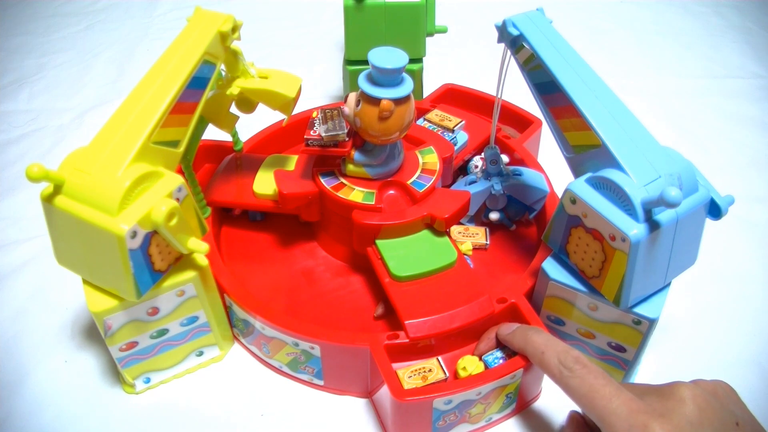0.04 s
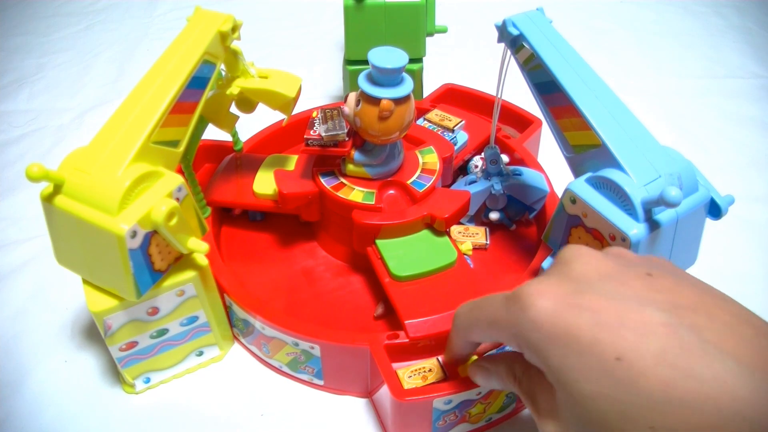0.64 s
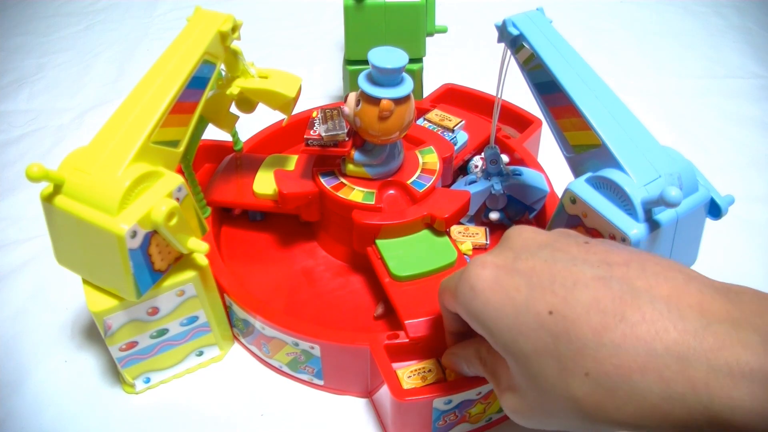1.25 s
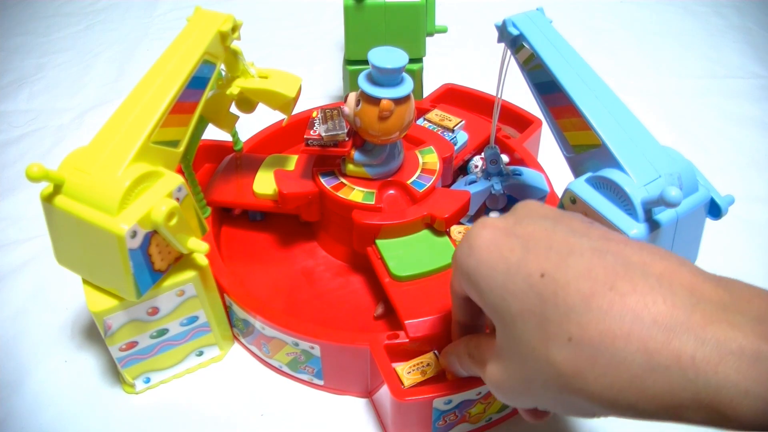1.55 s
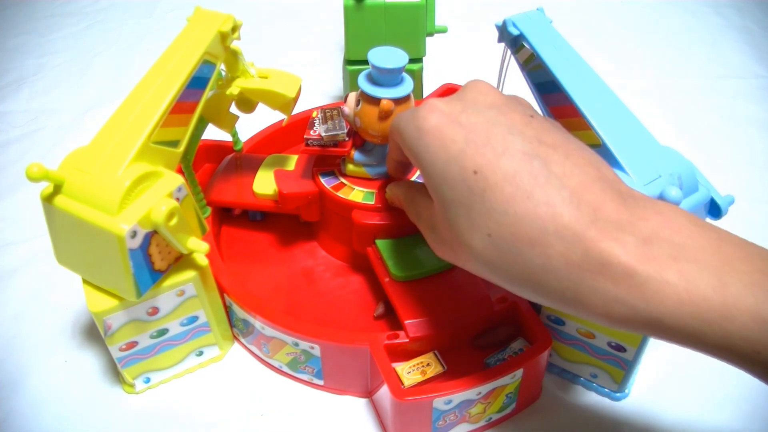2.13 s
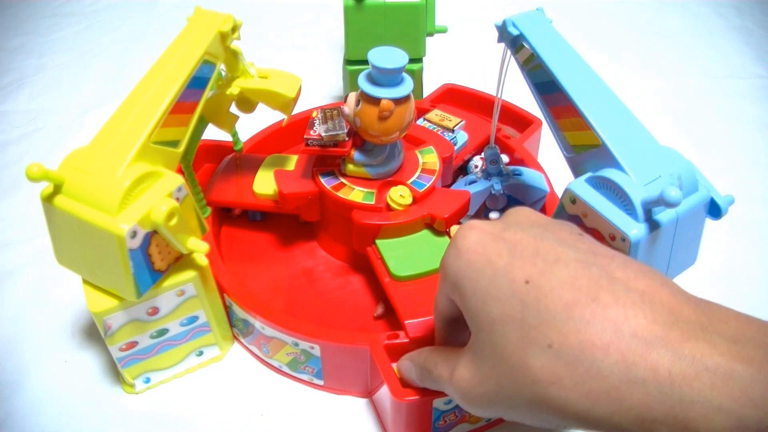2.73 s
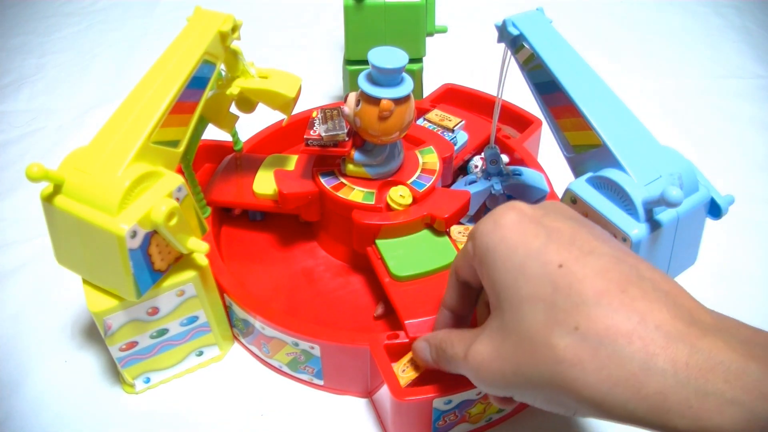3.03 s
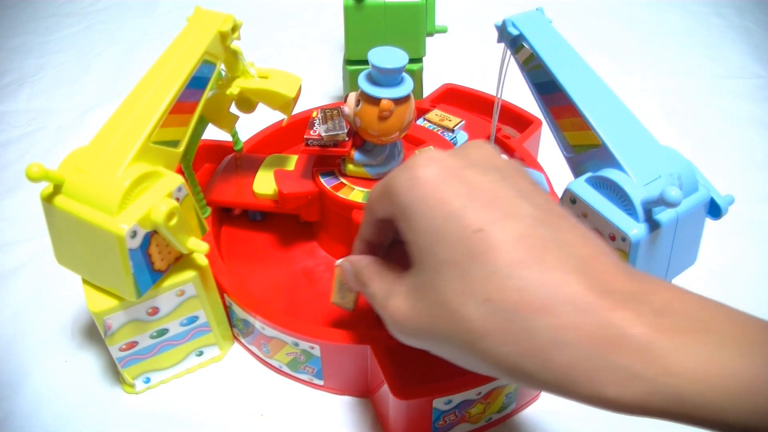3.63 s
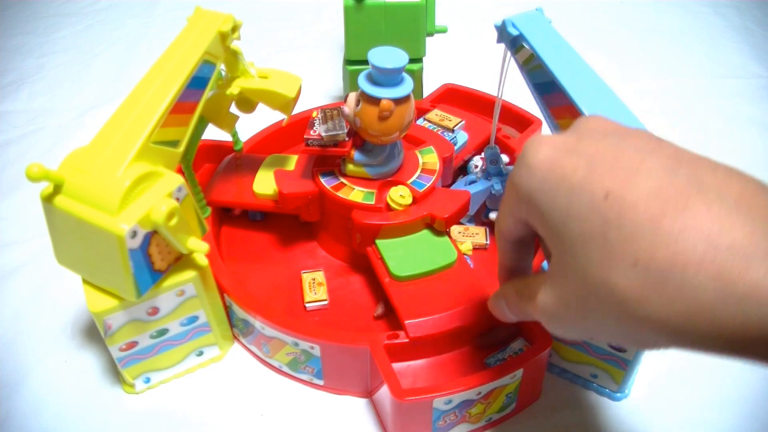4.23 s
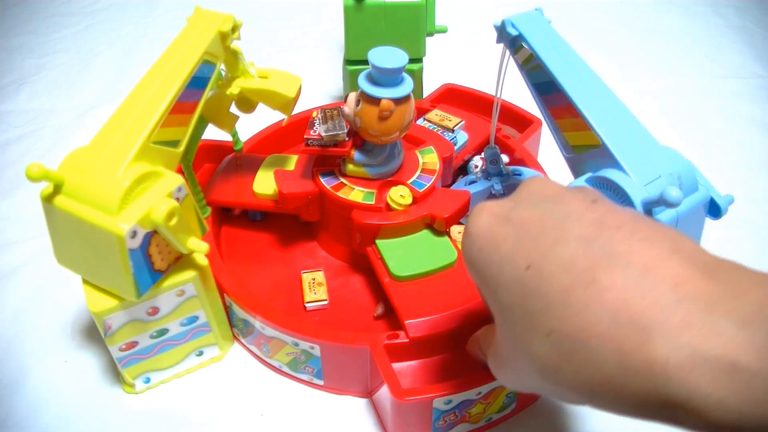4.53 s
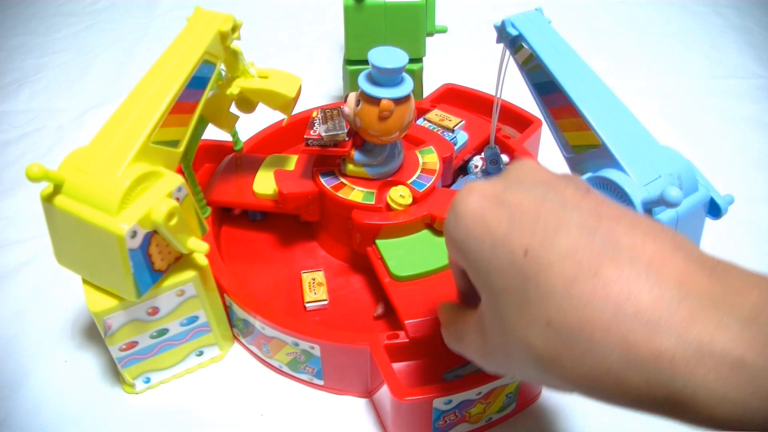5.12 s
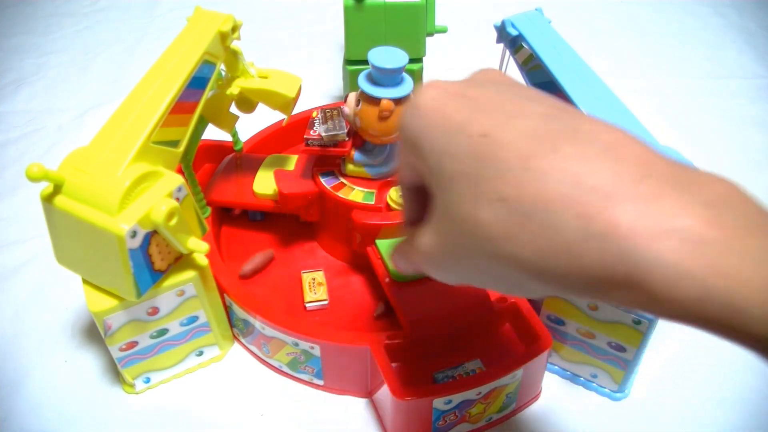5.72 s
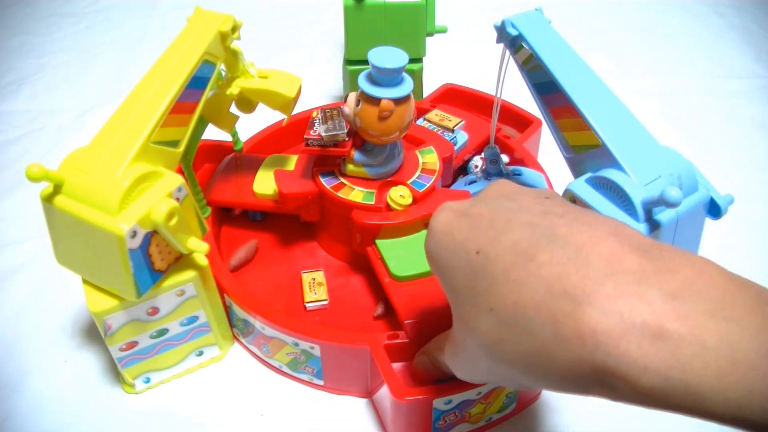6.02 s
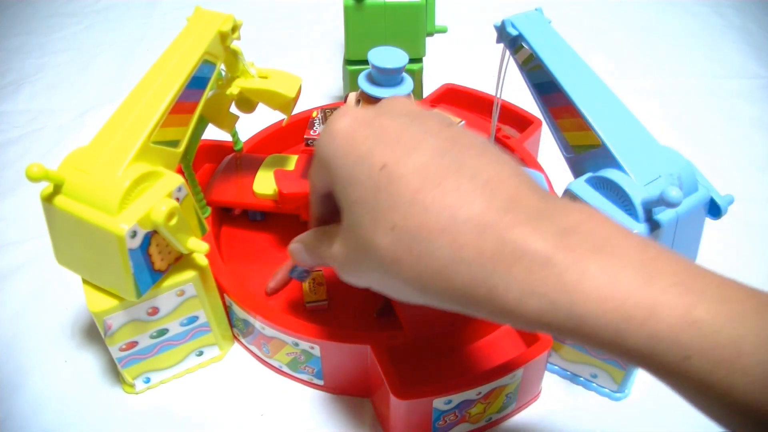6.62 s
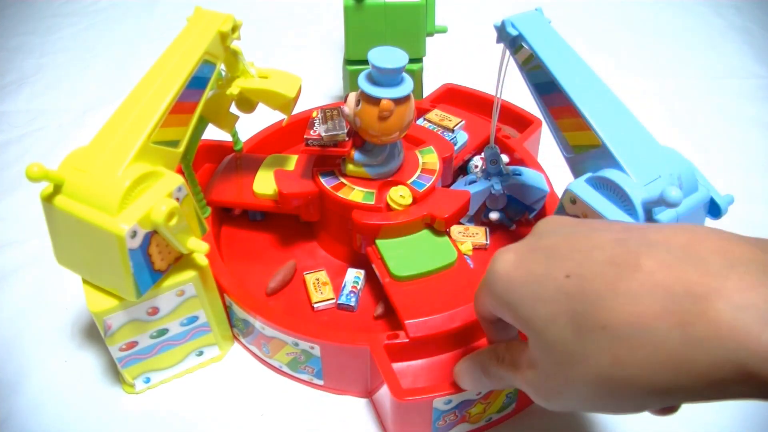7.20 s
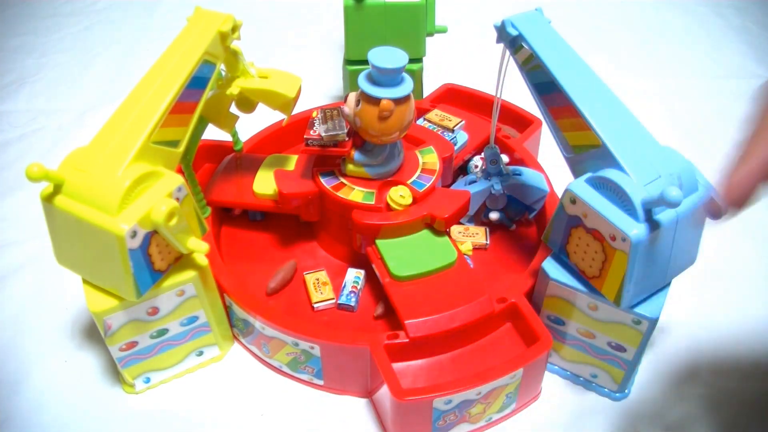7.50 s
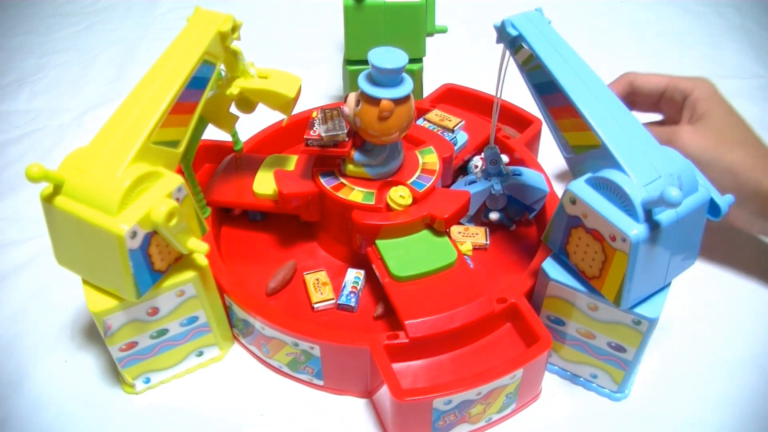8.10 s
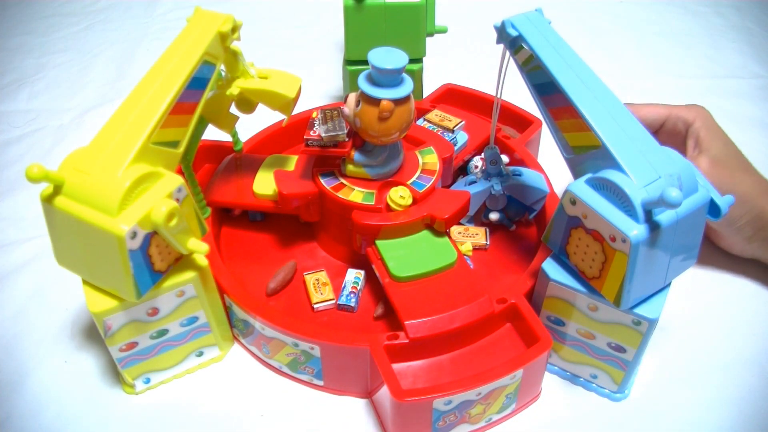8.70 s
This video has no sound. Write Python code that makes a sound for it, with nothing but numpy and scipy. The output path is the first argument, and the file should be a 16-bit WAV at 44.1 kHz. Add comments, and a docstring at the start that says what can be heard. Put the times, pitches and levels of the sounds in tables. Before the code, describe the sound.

After a faint swish of clothing, fingers pick small plastic prizes from the tray of a toy crane game and set or drop them on its hollow turntable. Sharp, irregular clacks, little bounces and wobbles make the thin shell ring briefly, with light ticks and fingertip scrapes between them. Soft bumps follow as the hand grasps the toy. It is close to a stereo microphone in a small room with a low hum.

```python
"""A faint swish of clothing and a fingertip scrape, then clacks: a hand picks small plastic prizes from
the tray of a toy crane game and sets or drops them on its hollow turntable. Each clack, bounce, tick,
press or wobble sets the thin shell ringing; fingers rub in the tray, and at the end they grasp the toy.
It stands on a table in a small room, close in front of a stereo microphone, with a low hum underneath."""
import sys
import numpy as np
from scipy import signal
from scipy.fft import rfft, irfft
from scipy.io import wavfile
from scipy.ndimage import uniform_filter1d

SR = 44100
rng = np.random.default_rng(int(sys.argv[2]) if len(sys.argv) > 2 else 0)


def transcribe(u):
    """Save the signal u as a 16-bit wav file named by the first command-line argument.

    u: samples, shape (n,) or (channels, n), limited to [-1, 1]; the rate is SR.
    q: integer samples, one column per channel.
    """
    v = np.clip(np.atleast_2d(u).T, -1, 1)
    q = np.round(v * 32767).astype(np.int16)
    wavfile.write(sys.argv[1], SR, q)


N = 385875


def prize_knocks():
    """Prizes strike the shell, hollow on a panel and bright on an edge, or bounce free and ring."""
    # strikes: start_s, level_db, hollow_db, bright_db_per_octave, ring_hz
    strikes = [(0.6696, 19, -9, -1, 1625), (0.796, 15.5, -5, 0, 3260), (0.8057, 14.5, -0.5, 1, 1680),
               (0.8731, 4, -0.5, -5, 1660), (1.1049, -3.5, 6.5, -0.5, 1740), (1.1795, 12.5, -3, 3.5, 3260),
               (1.5, -7.5, 6.5, -0.5, 1660), (1.5454, -13, 4, -12, 1630), (2.2015, 17, -9.5, -2, 4470),
               (2.228, -4.5, 7, -2.5, 1680), (2.5251, 1, 8.5, 0.5, 1630), (2.5837, -9, -2, -1, 1920),
               (3.236, 4, 8.5, 1.5, 3480), (3.5014, -12, 1, 0.5, 1580), (3.8006, 6, -2, -3.5, 1240),
               (3.839, -10, 4, -4, 1270), (3.9132, 9, -3, 4, 5250), (4.2298, -12.5, 10, 4.5, 1380),
               (4.2428, -7, 6.5, 4, 1410), (4.2965, -10.5, 4, -27, 1640), (4.5639, 11, 3, 1, 1035),
               (4.594, 2.5, -3, 0.5, 1350), (5.563, 19.5, 0.5, 2.5, 1300), (5.5926, 18, -6, 4, 1910),
               (6.4462, -1, -0.5, 0.5, 1950), (8.0674, -7.5, 4, 0.5, 1970)]
    # their tone: frequency_hz, gain_db
    strike_colour = [(220, -10), (900, -5), (1900, -1.5), (4500, -8), (11000, -17.5)]
    # free bounces: start_s, level_db, bright_db_per_octave
    bounces = [(0.7776, 1.5, -3), (3.9585, 2, -2.5), (3.9766, -1, -3), (5.2258, -15, 3.5),
               (5.8808, -1.5, -4.5), (5.9148, -8, -4.5), (6.7614, 3.5, 0.5), (6.791, -2, -2),
               (6.806, -5, 1), (6.865, -0.5, -2.5), (6.9102, -4, -1), (6.938, -7, 4), (6.958, -19, 5.5)]
    # their tone: frequency_hz, gain_db
    bounce_colour = [(220, -36), (900, -11), (1900, -4.5), (4500, -6.5), (11000, -13.5)]
    strike_ring_db, bounce_ring_hz, bounce_ring_db = 10.5, 3200, 13
    return ([(s, db, hollow, bright, strike_colour, hz, strike_ring_db)
             for s, db, hollow, bright, hz in strikes]
            + [(s, db, 0, bright, bounce_colour, bounce_ring_hz, bounce_ring_db)
               for s, db, bright in bounces])


def finger_knocks():
    """A nail or hard edge catches a prize with a tick; fingers land on the toy with a thud."""
    # ticks: start_s, level_db, bright_db_per_octave, ring_hz
    ticks = [(3.0817, -18, 6.5, 11800), (3.105, -14.5, -1.5, 11250), (3.219, -11.5, 0.5, 7140),
             (4.7694, -13, 1.5, 3900), (4.864, -5, -4, 8600), (5.1563, -2.5, 3, 7540),
             (5.9981, -8.5, -1, 7650), (6.1383, -16, -0.5, 3800), (6.69, 8, 0.5, 8170),
             (6.8366, -11, 0.5, 7600), (6.896, -4.5, 0.5, 8100), (7.073, -7, -1, 7300),
             (7.105, -10, 1, 7500)]
    # their tone: frequency_hz, gain_db
    tick_colour = [(220, -15), (900, -7), (1900, 1.5), (4500, -2.5), (11000, -6)]
    # finger presses: start_s, level_db, bright_db_per_octave, ring_hz
    presses = [(.264, -26, -1, 710), (0.6359, -17.5, -7, 1690), (.929, -16, -6, 1650),
               (2.6179, -5, -1.5, 780), (2.6321, -13.5, -0.5, 1610), (3.3297, -10, -14, 2150),
               (4.323, -20.5, -23, 575), (4.848, -8.5, -3, 5250), (4.928, -22.5, 1.5, 665),
               (6.012, -11, 4, 3620), (7.136, -10, 3, 3560), (8.09, -18.5, -1, 825), (8.126, -14, -23, 700),
               (8.147, -16.5, -24, 650)]
    # their tone: frequency_hz, gain_db
    press_colour = [(220, 21.5), (900, 5.5), (1900, -1.5), (4500, 3.5), (11000, -7)]
    tick_ring_db, press_ring_db = 11.5, 11
    return ([(s, db, 0, bright, tick_colour, hz, tick_ring_db) for s, db, bright, hz in ticks]
            + [(s, db, 0, bright, press_colour, hz, press_ring_db) for s, db, bright, hz in presses])


def wobble_knocks(ring_hz=1245, ring_db=17):
    """A loose prize rocks on the hollow turntable; the gentler the knock, the duller it is."""
    # rocking contacts: start_s, level_db
    wobbles = [(2.0266, -8), (5.7142, -0.5), (5.794, -8.5), (5.8844, -4), (6.295, -5.5), (6.3685, -14.5),
               (6.418, -13), (6.4343, -9), (6.6389, -9), (6.6484, -7), (7.361, -11.5)]
    # their tone: frequency_hz, gain_db
    colour = [(220, 1), (900, -2.5), (1900, -2), (4500, -3.5), (11000, -22)]
    brightening = 0.65   # dB per octave for each dB of level
    return [(s, db, 0, brightening * db, colour, ring_hz, ring_db) for s, db in wobbles]


def touch_knocks(strokes, count=20, over_rub_db=33.5, spread_db=1, ring_hz=3360, ring_db=6):
    """Rummaging fingers touch at random, most often and most firmly where they rub hardest."""
    # tone of a light touch: frequency_hz, gain_db
    colour = [(220, 11), (900, 7), (1900, 9), (4500, -19.5), (11000, 11.5)]
    rubbed_so_far = np.cumsum(strokes) / np.sum(strokes)
    at = np.searchsorted(rubbed_so_far, rng.random(count)).clip(0, N - 1)
    levels_db = 20 * np.log10(strokes[at] + 1e-9) + over_rub_db + spread_db * rng.standard_normal(count)
    return [(s, db, 0, 0, colour, ring_hz, ring_db) for s, db in zip(at / SR, levels_db)]


def knock_db(knock, hz):
    """A knock's level at one frequency: hollowness acts below 1900 Hz, brightness above."""
    start_s, level_db, hollow, bright, colour, ring_hz, ring_db = knock
    octaves = np.log2(hz / 1900)
    return level_db + at_hz(colour, hz) + hollow * np.clip(-octaves, 0, 1) + bright * max(octaves, 0)


def clacks(knocks, contact_s, alike, relative_ring_width, chatter_db, snap):
    """Each knock chatters briefly into dense, damped modes; one mode of the struck part stands out."""
    # decay of the dense modes: frequency_hz, t60_s
    decay = [(150, .08), (400, .045), (1000, .032), (2000, .026), (5000, .016), (12000, .011)]
    # tone of thin plastic: frequency_hz, gain_db
    plastic = [(150, -3.5), (450, -1), (800, 0.5), (1100, 1), (1600, 3), (2100, 1), (2600, -3.5),
               (3300, 4.5), (4100, -7.5), (5300, -2.5), (6500, -1), (8000, -0.5), (12000, -2.5)]
    t = np.arange(SR // 10) / SR
    levels_db = np.array([knock[1] for knock in knocks])
    # light touches drag a little longer; firm ones open with a sharp snap
    lightness = np.clip(-levels_db[:, None, None] / 20, 0, 1)
    held_s = contact_s + lightness * 0.00027
    chatter = rng.standard_normal((len(knocks), 2, 2, len(t)))
    chatter *= 1 + snap * (1 - lightness[:, None]) * np.exp(-t / 0.0015)
    bursts, out = 0, np.zeros((2, N))
    for k, (hz, share, band) in enumerate(bands(lowest_hz=130)):
        envelope = dying(np.maximum(t - held_s, 0), at_hz(decay, hz))
        burst = unit_energy(signal.sosfilt(band, chatter[:, k % 2] * envelope + 1e-18))
        band_db = [knock_db(knock, hz) + at_hz(plastic, hz) + chatter_db for knock in knocks]
        gains = from_db(band_db) * np.sqrt(share)
        bursts = bursts + stereo(burst[:, 0], burst[:, 1], alike) * gains[:, None]
    for k, (start_s, *_, ring_hz, ring_db) in enumerate(knocks):
        damping = np.pi * relative_ring_width * ring_hz
        height = from_db(knock_db(knocks[k], ring_hz) + ring_db) * 2 * damping / SR
        ring = height * np.exp(-damping * t) * np.sin(2 * np.pi * ring_hz * t)
        add(out, start_s, bursts[:, k] + ring)
    # the very top of the clacks is dulled
    return signal.sosfilt(signal.butter(3, 12600, fs=SR, output="sos"), out)


def rattles(per_s):
    """A dropped prize buzzes to rest in quick, shrinking bounces on the turntable's thin floor."""
    # drops: start_s, level_db, t60_s
    drops = [(2.203, -43, 0.043), (5.57, -11.5, 0.024), (5.595, -19.5, .15)]
    # tone of the buzz: frequency_hz, gain_db
    colour = [(500, -37), (900, -8), (1300, -9), (2000, -3), (3500, -2.5), (7500, -12), (11000, -17),
              (15000, -31)]
    t, envelope = np.arange(SR // 2) / SR, np.zeros(N)
    for start_s, db, t60 in drops:
        add(envelope, start_s, from_db(db) * dying(t, t60))
    return envelope * coloured(slips(per_s, spread_db=1.5), colour)


def shell(contacts):
    """The toy's thin shell rings on after every contact."""
    # shell modes: pitch_hz, gain_db, t60_s
    modes = [(832, 3, 0.2), (1114, -19, 0.49), (1273, -13, 1), (1400, 16, 0.28), (1736, -10.5, 0.092),
             (1870, 1, 0.23), (1916, 0, 0.12), (2140, 9, 0.26), (2650, -19, 0.65), (2770, 20, 0.12),
             (3064, -2, 0.33), (3580, -99, 0.51), (3860, -3, 0.68), (5470, 2, 0.049)]
    return from_db(-12.5) * ring_modes(contacts, modes)


def turntable(buzz):
    """The hollow turntable rings under a dropped prize."""
    # turntable modes: pitch_hz, gain_db, t60_s
    modes = [(1156, 23, 0.1), (1314, 16, 0.078), (1340, 20, 0.22), (1380, 0.5, 0.35), (1490, 4.5, 0.46),
             (1780, 12, .3), (1880, 11, 0.22)]
    return ring_modes(buzz, modes)


def finger_strokes():
    """How hard the fingertips rub in the tray, as a gain over time."""
    # one curve per stroke: time_s, level_db
    curves = [
        [(0.16, -67.5), (0.22, -54.5), (0.255, -69)],
        [(1.32, -70.5), (1.34, -70.5), (1.362, -52), (1.384, -56), (1.42, -74)],
        [(2.78, -78), (2.824, -58.5), (2.872, -81), (2.882, -61), (3.07, -58)],
        [(3.11, -51.5), (3.152, -67), (3.21, -54), (3.215, -52)],
        [(3.26, -66.5), (3.338, -48), (3.37, -67), (3.514, -59.5), (3.54, -78.5)],
        [(4.7, -77), (4.772, -45.5), (4.782, -55), (4.82, -52.5), (4.84, -60)],
        [(4.9, -60.5), (5.01, -61.5), (5.078, -47), (5.114, -53), (5.14, -82.5)],
        [(6.025, -45.5), (6.081, -65.5), (6.147, -49), (6.167, -61.5), (6.22, -72)],
        [(6.23, -66), (6.264, -54.5), (6.286, -56), (6.32, -76.5)],
        [(6.46, -71), (6.484, -56), (6.498, -70.5), (6.52, -62.5)],
        [(7.15, -64), (7.16, -65), (7.194, -56.5), (7.276, -67), (7.3, -61)],
    ]
    return effort(curves)


def rubbing(strokes, scrape_db, body_db, slide_db):
    """Skin and prizes slide in a stream of fine slips, heard directly and through the hollow body."""
    # one curve per sliding prize, the last for the hand's grip rubbing the toy: time_s, level_db
    slides = [
        [(0.98, -54), (1.062, -55.5), (1.16, -59.5)],
        [(2.02, -64), (2.13, -64)],
        [(6.62, -62), (6.694, -60), (6.814, -52), (6.988, -53), (7.16, -60)],
        [(8.06, -55), (8.18, -70)],
    ]
    # tone of the direct scrape: frequency_hz, gain_db
    scrape_colour = [(1700, -11), (2800, -1.5), (3450, 9), (4100, -2), (5800, -1), (7800, 4), (10000, -11),
                     (12400, -1), (15500, -37)]
    # tone through the body: frequency_hz, gain_db
    body_colour = [(600, -5), (1000, -3), (1350, -0.5), (1900, -4), (2600, -13), (3500, -6)]
    scrape = strokes * from_db(scrape_db)
    body = strokes * from_db(body_db) + effort(slides) * from_db(slide_db)
    # the grip of the skin flutters by a decibel or two
    grip = rms_one(signal.sosfilt(signal.butter(2, 90, fs=SR, output="sos"), rng.standard_normal(N)))
    grains = slips(per_s=8000, spread_db=2.5) * from_db(1.7 * np.clip(grip, -2, 2))
    return scrape * coloured(grains, scrape_colour) + body * coloured(grains, body_colour)


def bumps(rise_s):
    """The hand's weight rocks the toy on the table."""
    # deep bumps through toy and table: start_s, level_db, pitch_hz, t60_s
    thumps = [(2.620, -25.5, 176, 0.093), (2.620, -21.5, 266, 0.056), (3.238, -10, 314, 0.012),
              (3.238, -13.5, 422, 0.014), (4.304, -41, 155, 0.27), (7.136, -37, 141, 0.062),
              (7.137, -29.5, 486, 0.049), (8.052, -26.5, 55.7, 0.17), (8.165, -29.5, 70.6, 0.077)]
    t, out = np.arange(SR // 2) / SR, np.zeros(N)
    for start_s, db, hz, t60 in thumps:
        envelope = from_db(db) * (1 - np.exp(-t / rise_s)) * dying(t, t60)
        add(out, start_s, -envelope * np.sin(2 * np.pi * hz * t))
    return out


def clothing():
    """Cloth swishes, soft and high, as the arm reaches."""
    # arm movements: centre_s, half_length_s, level_db
    swishes = [(.21, 0.031, -79), (0.598, 0.14, -54.5), (0.846, 0.074, -49.5), (1.836, 0.057, -51.5),
               (5.427, 0.052, -61), (7.425, 0.082, -54)]
    # tone of the cloth: frequency_hz, gain_db
    colour = [(2500, -6), (4000, -13), (7000, -10), (10000, -7), (13000, -5), (16000, -10.5)]
    t = np.arange(N) / SR
    motion = sum(from_db(db) * np.exp(-((t - s) / half) ** 2 / 2) for s, half, db in swishes)
    return motion * coloured(stereo(*rng.standard_normal((2, N)), alike=0.23), colour)


def room(x, build_s, alike):
    """Reflections from the table and near walls build up quickly and die sooner in the treble."""
    # reverberation time: frequency_hz, t60_s
    decay = [(150, 0.33), (600, 0.26), (1500, 0.22), (3200, 0.21), (6000, 0.17), (13000, 0.12)]
    # strength of the reflections: frequency_hz, gain_db
    strength = [(150, -5.5), (600, -5), (1500, -6.5), (3200, -8), (6000, -13), (9000, -15.5), (14000, -14)]
    t, response = np.arange(SR // 2) / SR, 0
    for hz, share, band in bands(lowest_hz=110.23):
        envelope = (1 - np.exp(-(t / build_s) ** 2)) * dying(t, at_hz(decay, hz))
        tail = unit_energy(signal.sosfilt(band, rng.standard_normal((2, len(t))) * envelope))
        response = response + stereo(*tail, alike) * np.sqrt(share) * from_db(at_hz(strength, hz))
    return signal.fftconvolve(x, response, axes=1)[:, :N]


def room_tone(air_db, hum_alike):
    """Rumble and hiss all around the microphone, with three wavering hum tones."""
    # tone of the rumble and hiss: frequency_hz, gain_db
    colour = [(15, -30), (25, 0.5), (97, -14.5), (117, -6.5), (236, -8.5), (256, -11.5), (285, -12),
              (373, -14), (451, -15.5), (607, -18), (1130, -23.5), (1230, -26.5), (1330, -26), (3160, -33),
              (16000, -41)]
    # how alike left and right are: frequency_hz, likeness
    likeness = [(60, -1.3), (150, -0.19), (380, -0.34), (950, -0.48), (2380, -0.078), (5980, -0.19),
                (15000, 0.17)]
    # hum tones: pitch_hz, level_db, width_hz
    tones = [(44, -53.5, 9.1), (92, -55, 3.8), (287.75, -56.5, 2.66)]
    air_spectrum = stereo(*rfft(rng.standard_normal((2, N))), at_hz(likeness, bin_hz()))
    air = coloured(irfft(air_spectrum, N), colour)
    white, hum = stereo(*rng.standard_normal((2, N + SR)), hum_alike), 0
    for hz, db, width in tones:
        tone = resonate(resonate(white, hz, 2 * width), hz, 2 * width)
        hum = hum + from_db(db) * rms_one(tone[:, SR:])   # one second to settle
    return from_db(air_db) * air + hum


def slips(per_s, spread_db):
    """Tiny stick-slip releases of uneven size, at random times."""
    sizes = from_db(spread_db * np.minimum(rng.exponential(1, (2, N)), 5))
    clicks = sizes * rng.standard_normal((2, N)) * (rng.random((2, N)) < per_s / SR)
    return stereo(*clicks, alike=0.73)


def effort(curves, fade_s=0.012):
    """Gain over time from short level curves, fading to silence between them."""
    t = np.arange(N) / SR
    gain = sum(from_db(np.interp(t, *np.transpose(curve), left=-np.inf, right=-np.inf))
               for curve in curves)
    return np.maximum(uniform_filter1d(gain, round(fade_s * SR)), 0)


def ring_modes(contacts, modes):
    """Contacts drive the modes of a hollow part, alternating in sign."""
    force = contacts.mean(axis=0)
    return sum((-1) ** k * from_db(db) * resonate(force, hz, np.log(1000) / np.pi / t60)
               for k, (hz, db, t60) in enumerate(modes))


def resonate(x, hz, width_hz):
    """Two-pole resonance with gain 1 at its top."""
    r = np.exp(-np.pi * width_hz / SR)
    feedback = [1, -2 * r * np.cos(2 * np.pi * hz / SR), r * r]
    return signal.lfilter(np.array([1, 0, -1]) * (1 - r * r) / 2, feedback, x + 1e-18)


def coloured(x, colour):
    """Give a steady signal a spectrum that falls away beyond its ends; rms 1."""
    hz = bin_hz()
    skirts = 1 / np.sqrt((1 + (colour[0][0] / hz) ** 8) * (1 + (hz / colour[-1][0]) ** 8))
    return rms_one(irfft(rfft(x) * from_db(at_hz(colour, hz)) * skirts, N))


def bands(lowest_hz):
    """Third-octave bands: centre_hz, share of the whole spectrum, filter."""
    edges_hz = np.geomspace(22, 17000, 30)
    for low, high in zip(edges_hz, edges_hz[1:]):
        if high > lowest_hz:
            band = signal.butter(2, [low, high], "band", fs=SR, output="sos")
            yield np.sqrt(low * high), 2 * (high - low) / SR, band


def stereo(mid, side, alike):
    """Two channels of given likeness from two unrelated signals."""
    alike = np.clip(alike, -1, 1)
    mid, side = np.sqrt(1 + alike) * mid, np.sqrt(1 - alike) * side
    return np.array([mid + side, mid - side]) / np.sqrt(2)


def add(out, start_s, sound):
    """Mix a sound in at start_s."""
    at = round(start_s * SR)
    out[..., at:at + sound.shape[-1]] += sound[..., :N - at]


def at_hz(points, hz):
    """Read a table on a log-frequency axis."""
    points = np.array(points)
    return np.interp(np.log(hz), np.log(points[:, 0]), points[:, 1])


def bin_hz():
    """Frequencies of a full-length spectrum, no lower than 1 Hz."""
    return np.maximum(np.arange(N // 2 + 1) * SR / N, 1)


def dying(t, t60):
    """Exponential decay, 60 dB down at t60."""
    return np.exp(-np.log(1000) * t / t60)


def from_db(db):
    """Decibels to gain."""
    return 10 ** (np.asarray(db) / 20)


def rms_one(x):
    """Scale to rms 1."""
    return x / np.sqrt(np.mean(x ** 2) + 1e-20)


def unit_energy(x):
    """Scale each row to the energy of a unit click."""
    return x / np.sqrt(np.sum(x ** 2, axis=-1, keepdims=True) + 1e-20)


def scene():
    """The toy close in front of the microphone, the arm a little to the right, the room around them."""
    strokes = finger_strokes()
    knocks = prize_knocks() + finger_knocks() + wobble_knocks() + touch_knocks(strokes)
    contacts = clacks(knocks, contact_s=0.0028, alike=0.77, relative_ring_width=0.053,
                      chatter_db=1.0, snap=0.45)
    buzz = rattles(per_s=1400)
    toy = contacts + buzz + shell(contacts + buzz) + turntable(buzz)
    direct = toy + rubbing(strokes, scrape_db=1.0, body_db=-15.0, slide_db=0.5)
    handling = direct + room(direct, build_s=0.0029, alike=0.61) + bumps(rise_s=0.0027)
    return (handling * from_db([[-.4], [.4]])   # left, right
            + clothing() * from_db([[-2.5], [1.5]])
            + room_tone(air_db=-46.58, hum_alike=0.44) * from_db([[-.9], [.9]]))


def record(dry):
    """The loudest peaks are rounded and the highest treble is cut."""
    ceiling, stopband_hz = .95, 16952
    rounded = ceiling * np.tanh(dry / ceiling)
    return signal.sosfilt(signal.cheby2(14, 70, stopband_hz, fs=SR, output="sos"), rounded)


dry = scene()
out = record(dry)
transcribe(out)
```